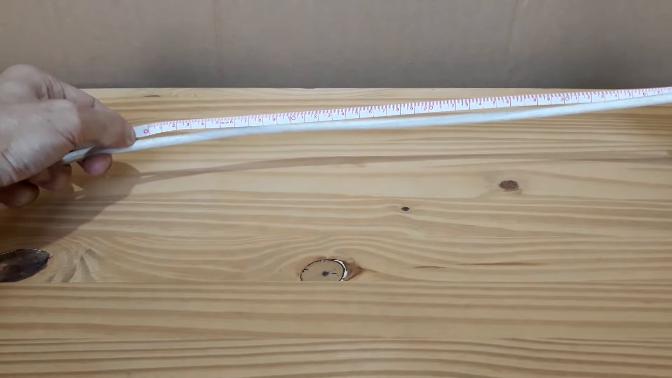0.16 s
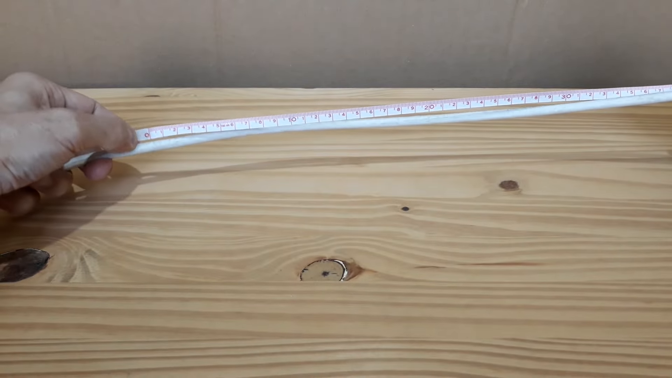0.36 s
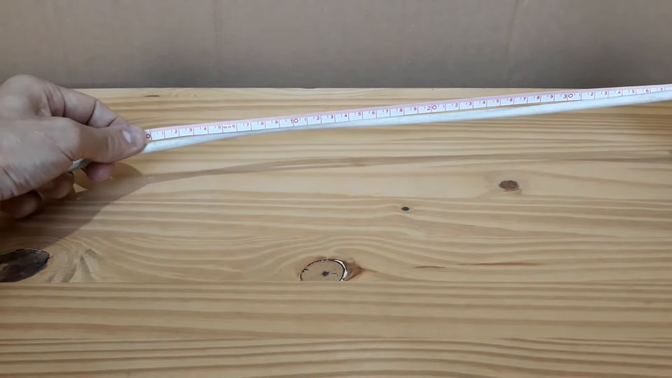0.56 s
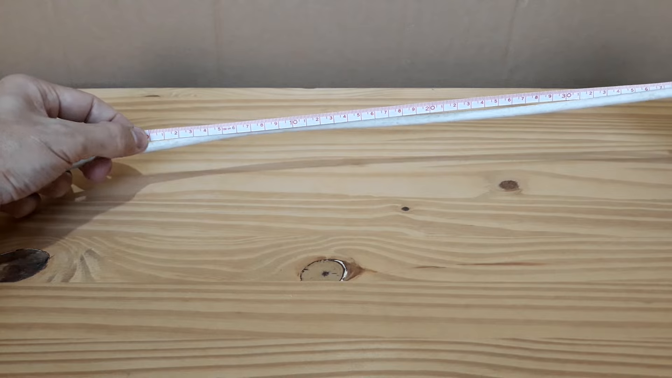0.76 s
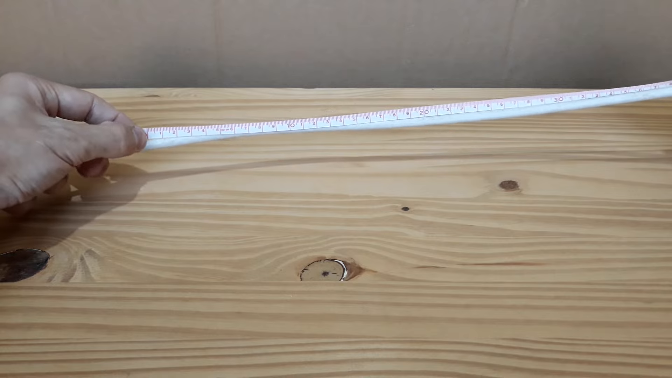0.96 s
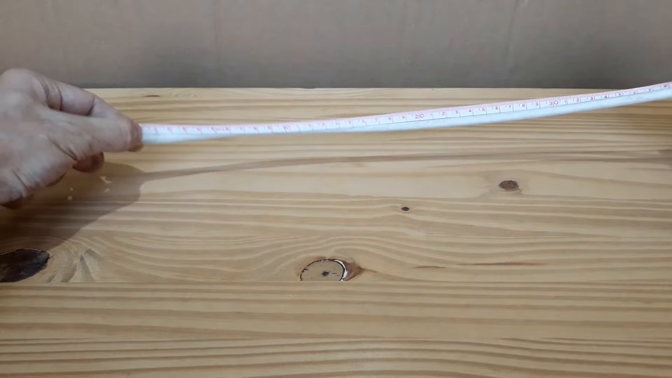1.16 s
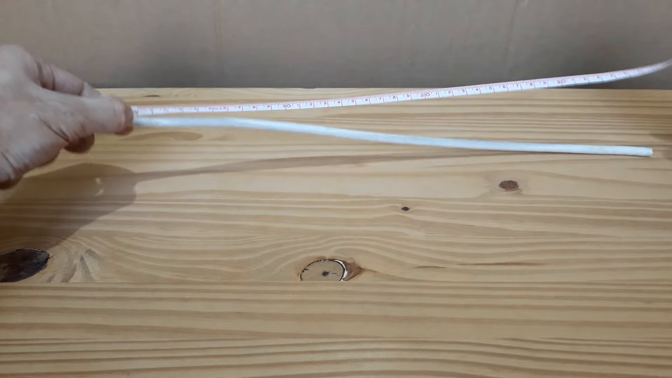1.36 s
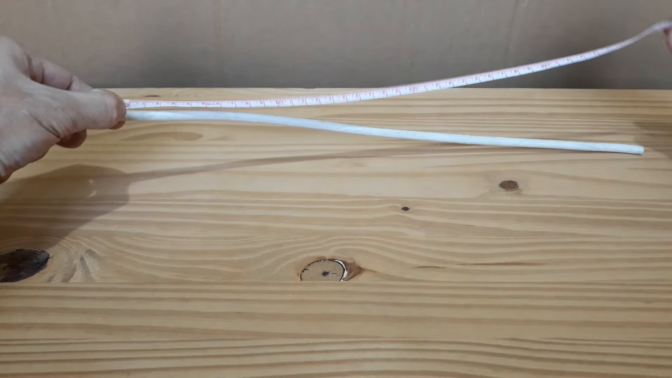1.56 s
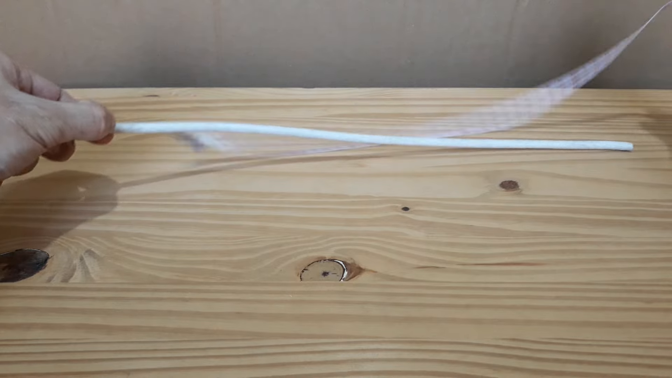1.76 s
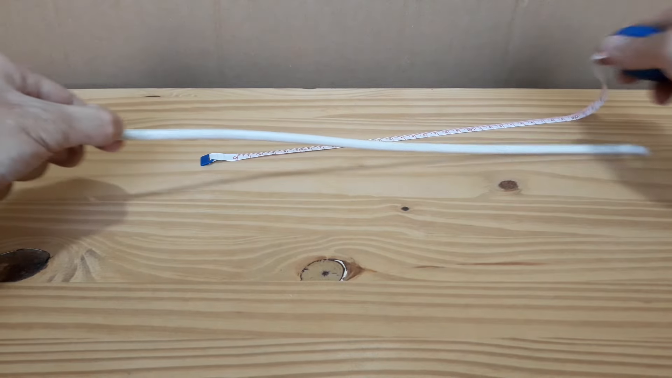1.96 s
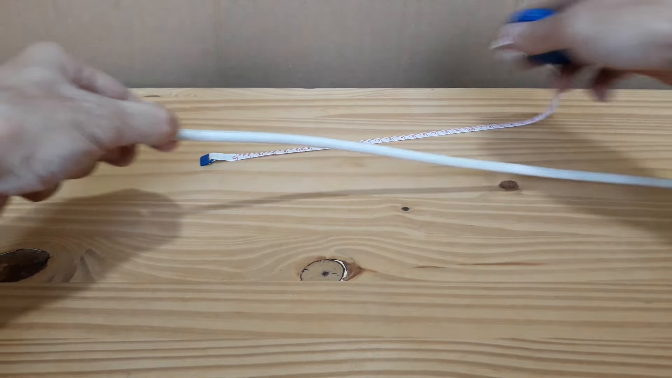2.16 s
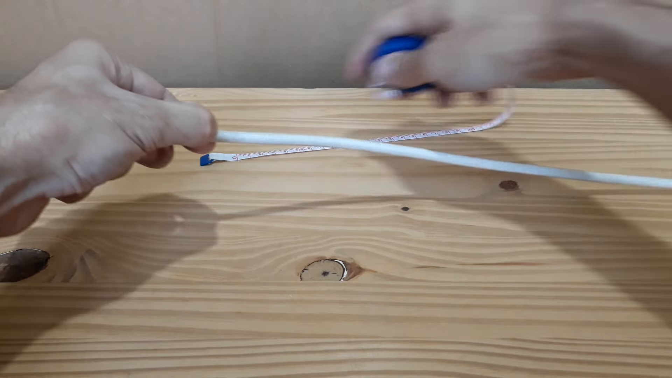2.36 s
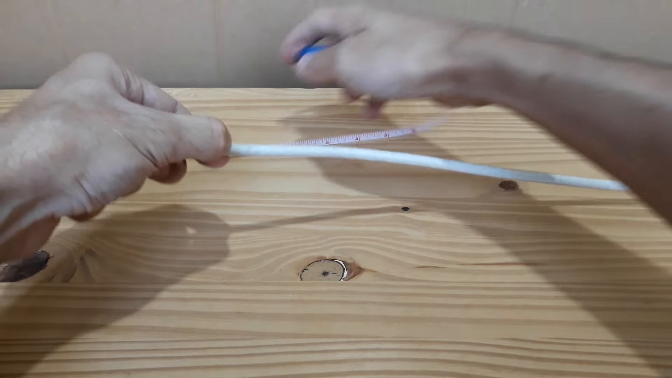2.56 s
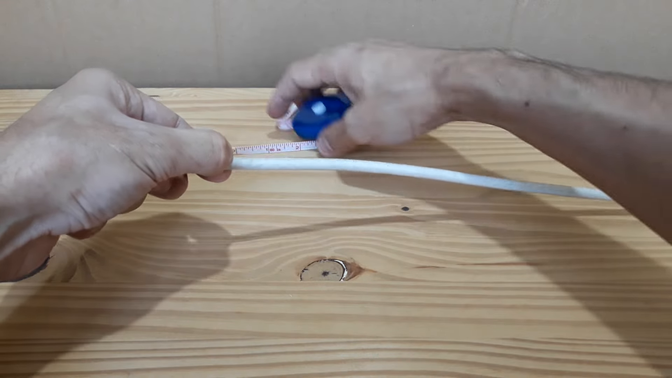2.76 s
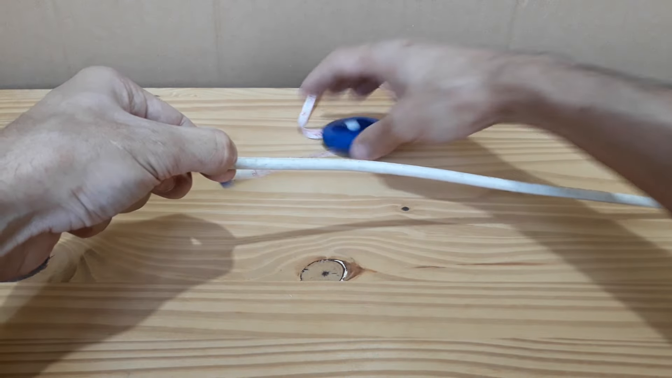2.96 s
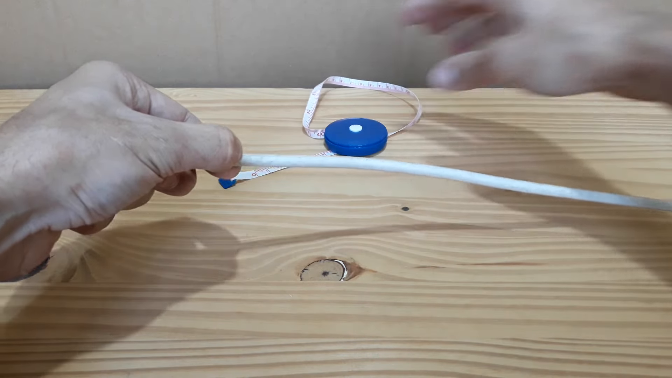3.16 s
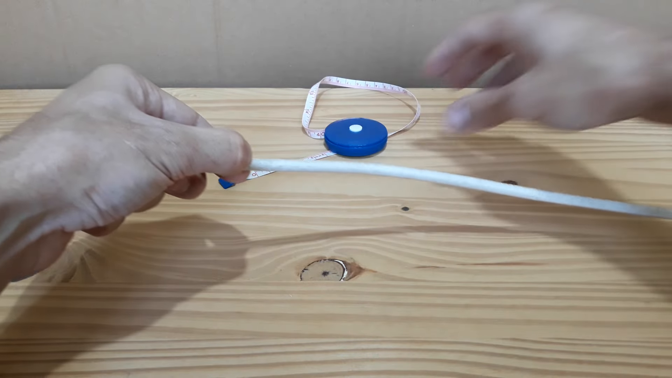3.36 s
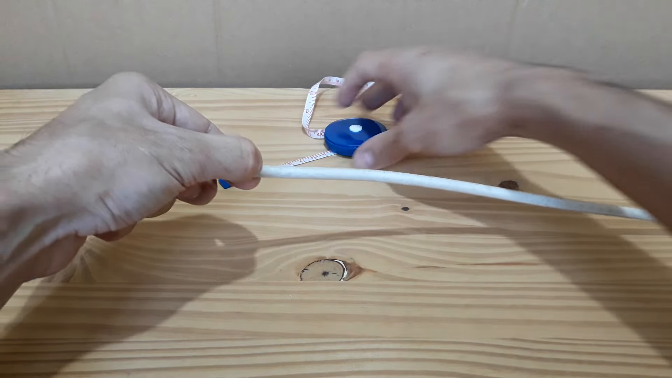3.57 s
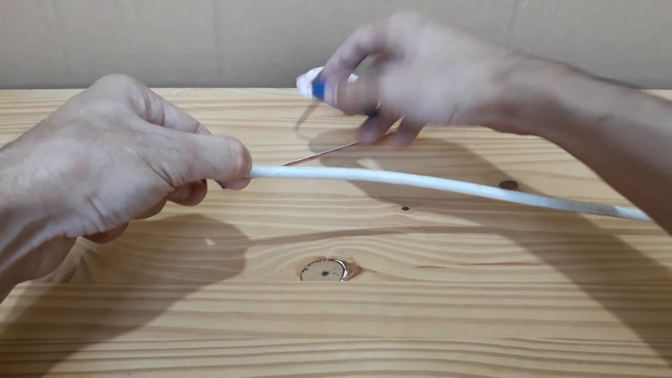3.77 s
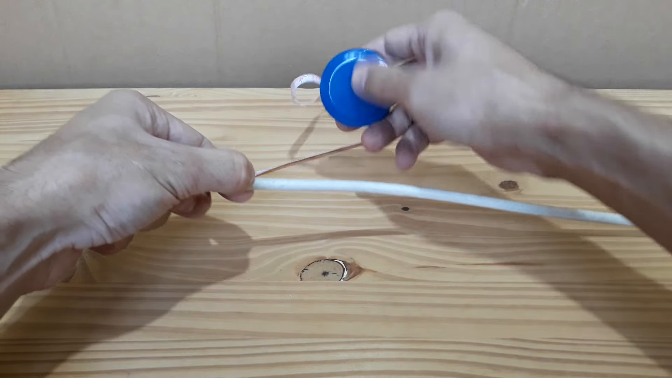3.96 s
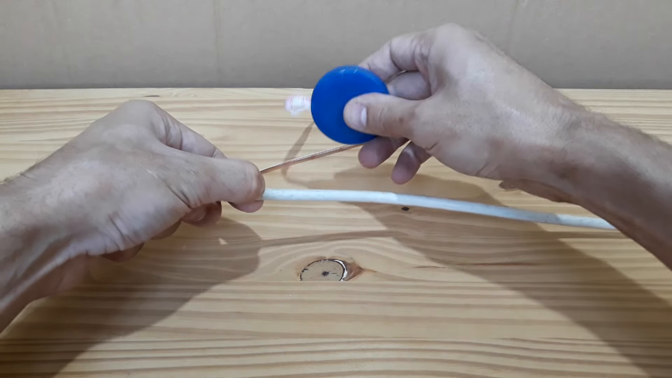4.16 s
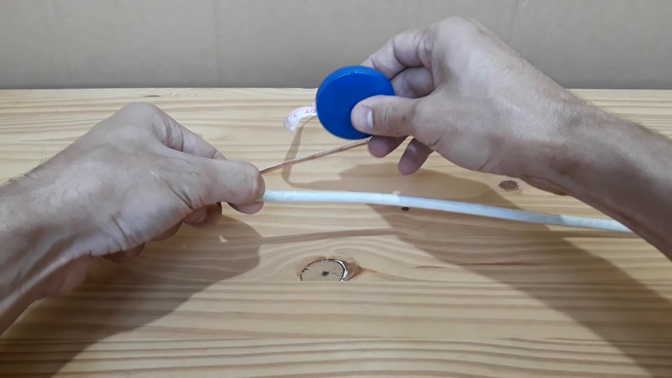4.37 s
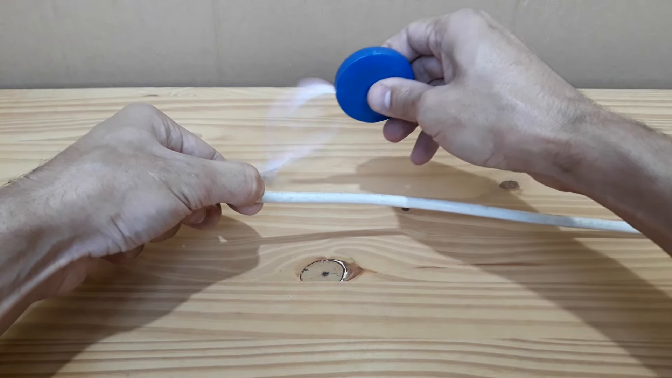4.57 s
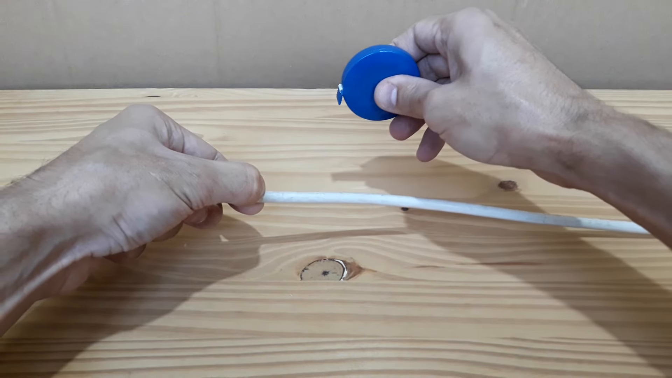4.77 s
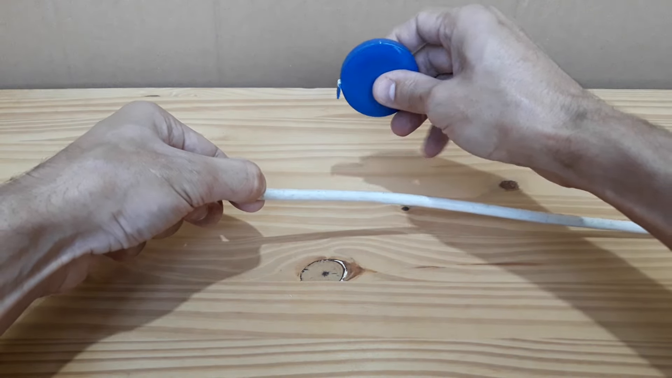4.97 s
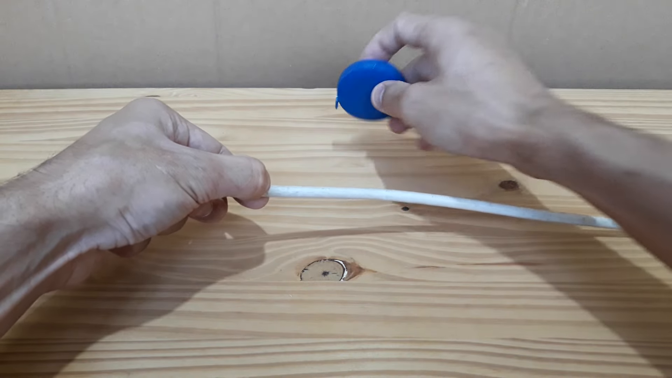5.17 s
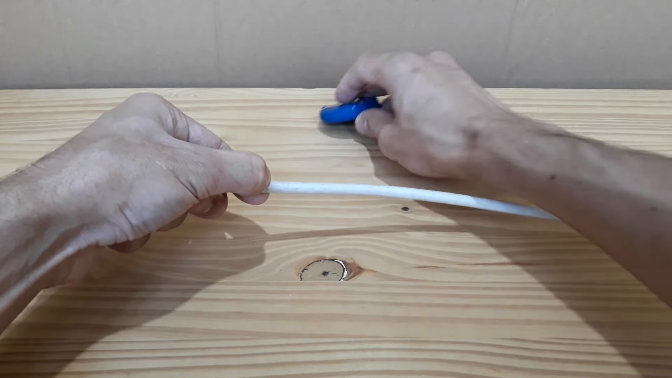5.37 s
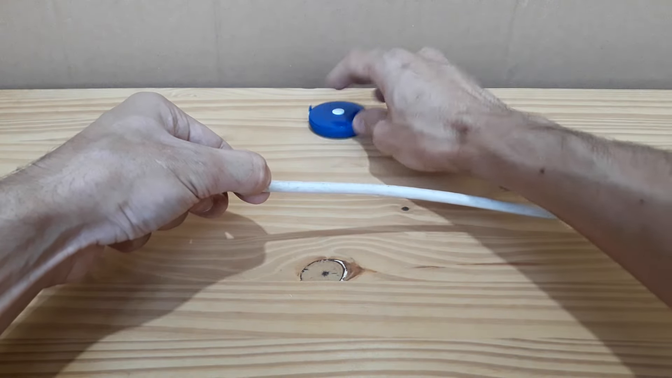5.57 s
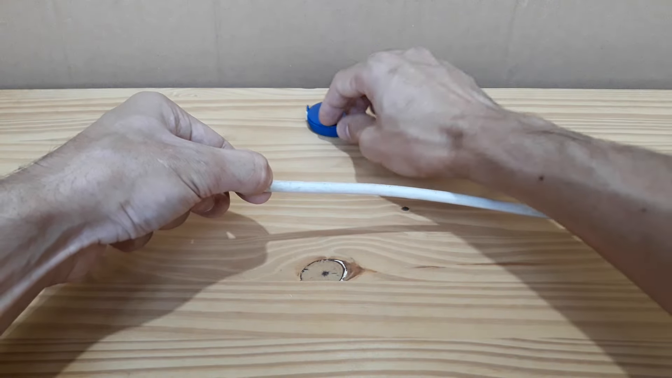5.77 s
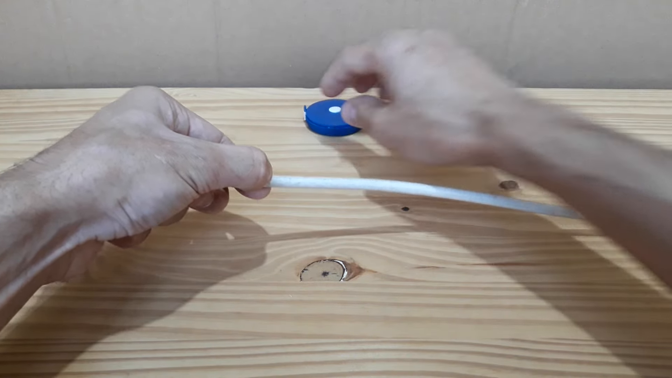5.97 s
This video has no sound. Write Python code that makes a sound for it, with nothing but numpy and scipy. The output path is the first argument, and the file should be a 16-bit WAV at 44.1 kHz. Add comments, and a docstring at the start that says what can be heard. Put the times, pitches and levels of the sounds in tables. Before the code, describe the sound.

A plastic rod slaps a wooden board, a small case drops and bounces, then a spring tape rattles in, snaps home hard and is set down.

```python
"""Spring tape measure on a wooden table

A small tape measure is handled in a bare, echoing room, over a faint rumble and hiss.
A plastic rod slaps the board; the case drops, is picked up, and its button lets the tape rattle in
and snap home so hard that a limiter ducks; then it is set down. Blows are bursts of tiny rebounds
shaped by the struck body, rubbing is a stream of random grains, and echoes are fading noise."""
import sys
import numpy as np
from scipy import signal
from scipy.fft import rfft, irfft
from scipy.io import wavfile
from scipy.ndimage import uniform_filter1d

SR = 44100
rng = np.random.default_rng(int(sys.argv[2]) if len(sys.argv) > 2 else 0)


def unload_audio(sound):
    """Save the sound as a 16-bit wav file, at the path given as the first command line argument."""
    columns = np.transpose(np.atleast_2d(sound))
    # keep every value between -1 and 1, then stretch to whole-number steps
    steps = np.round(np.clip(columns, -1, 1) * 32767)
    wavfile.write(sys.argv[1], SR, steps.astype(np.int16))


N = 265834
TIME = np.arange(N) / SR

# In the tables, energy is that of one blow; tilt brightens (+) or dulls (-) it above 100 Hz;
# chatter sets how slowly its rebounds fade; room is the level sent to the echoes, against the direct sound.

# Resonances of the wooden board: f/Hz, width/Hz, lift/dB
BOARD_RESONANCES = [(309.5, 22, 11.5), (385.8, 16, 12), (515, 26, 7), (698, 49, 4), (1104, 40, 2),
                    (1320, 55, 3.5), (1485, 30, 3.5), (1720, 40, 2), (2300, 60, 3.5), (2910, 130, 4.5),
                    (3430, 120, 3.5), (4000, 88, 4), (4680, 170, -2.5)]
# Resonances of the case: f/Hz, width/Hz, lift/dB
CASE_RESONANCES = [(1113, 220, 3.3), (3260, 110, 2), (4230, 90, 1.8), (4600, 216, 4.3), (5000, 150, 2.5),
                   (6470, 86, 4.8), (6540, 60, 2.9), (7530, 56, 2.3), (10300, 200, 3.4), (14370, 200, 2.8)]
# Broad colour of the spool: f/Hz, level/dB
SPOOL_COLOUR = [(150, -28), (550, -23.5), (950, -7), (2000, -17), (3000, -9), (4500, 1), (5700, -5),
                (7200, 0), (10500, -16.5), (14500, -9)]
# The tape snaps home: t/s, energy/dB, tilt/dB per octave, chatter/s, room/dB
SNAPS_HOME = [(4.6482, 7.6, 0.0023, 0.0015, 12.5), (4.6658, 22.36, 0.012, 0.0037, 5.1)]
# The tape runs in between these times (s)
REWIND_START_S, REWIND_END_S = 4.490, 4.643


def from_db(db):
    """Turn decibels into a gain."""
    return 10 ** (np.asarray(db) / 20)


def at_hz(points, hz):
    """Read a table of (frequency, value) between its points, on a log-frequency axis."""
    f, value = np.transpose(points)
    return np.interp(np.log(np.maximum(hz, 1)), np.log(f), value)


def unit_energy(x):
    """Scale to a summed square of one."""
    return x / np.sqrt(np.sum(x ** 2) + 1e-20)


def through(x, response):
    """Pass a sound through an impulse response."""
    return signal.fftconvolve(x, response)[:N]


def add(track, s, sound):
    """Mix a sound into a track at a given time in seconds."""
    start = round(s * SR)
    track[start:start + len(sound)] += sound[:N - start]


def body(colour, resonances=(), tilt_db=0, size=8192):
    """How a body answers one sharp tap: a broad colour with resonances standing out of it."""
    hz = np.fft.rfftfreq(size, 1 / SR)
    db = at_hz(colour, hz) + tilt_db * np.log2(np.maximum(hz, 100))
    for centre, width, lift_db in resonances:
        db = db + lift_db / (1 + (2 * (hz - centre) / width) ** 2)
    # Minimum phase: nothing rings before the blow
    cepstrum = irfft(np.log(from_db(db)))[:size // 2]
    cepstrum[1:] *= 2
    response = irfft(np.exp(rfft(cepstrum, size)))
    return unit_energy(response[:size // 2])


def chatter(decay_s, size=4096):
    """Force of one contact: a burst of tiny rebounds, roughly even in spectrum."""
    fade = np.exp(-TIME[:size] / decay_s)
    burst = rng.standard_normal(size) * fade * (1 - fade ** 5)
    spectrum = rfft(burst)
    even = irfft(spectrum / np.abs(spectrum))
    return unit_energy(even * fade ** (1 / 3))


def contacts(rows, colour, resonances):
    """Blows on one body, as a pair: sound straight to the microphone, sound into the room."""
    direct, into_room = np.zeros((2, N))
    for s, db, tilt_db, decay_s, room_db in rows:
        force = chatter(max(decay_s, 1 / SR))
        blow = from_db(db) * through(force, body(colour, resonances, tilt_db))
        add(direct, s, blow)
        add(into_room, s, blow * from_db(room_db))
    return np.array([direct, into_room])


def alike(rows, decay_s, room_db):
    """Give a set of contacts one chatter setting and one room level."""
    return [(*row, decay_s, room_db) for row in rows]


def grains(per_s, spread_db):
    """Random tiny impacts of uneven size, with a mean power near one."""
    signs = rng.choice([-1, 1], N)
    sizes = from_db(spread_db * np.minimum(rng.exponential(1, N), 4)) * signs
    chance = np.maximum(per_s, 1) / SR  # of an impact in each sample
    hits = rng.random(N) < chance
    return hits * sizes / sizes.std() / np.sqrt(chance)


def strokes(rows, attack_s, release_s):
    """Gain of sliding movements: each swells up to its start, holds for its length and dies away."""
    gain = np.zeros(N)
    for s, length_s, db in rows:
        early = np.maximum(s - TIME, 0)
        late = np.maximum(TIME - s - length_s, 0)
        gain += from_db(db) * np.exp(-early / attack_s - late / release_s)
    return gain


def rubbing(gain, colour, per_s, spread_db, room_db):
    """Two surfaces catch and slip in fine grains; gives the direct sound and the sound into the room."""
    rub = through(gain * grains(per_s, spread_db), body(colour))
    return np.outer([1, from_db(room_db)], rub)


def background():
    """A slowly swelling, distant outdoor rumble and a steady hiss, both made of coloured noise."""
    # Rumble level before a further 1 dB of gain: t/s, level/dB
    rumble_level = [(0.0, -58), (1.47, -48), (1.82, -51), (3.04, -52), (3.46, -57), (4.01, -61), (4.3, -57)]
    # Colour of the rumble: f/Hz, level/dB
    rumble_colour = [(20, -14), (45, -7.5), (82, 2), (150, -3.5), (300, -1), (600, -6.5), (1100, -10),
                     (1700, -13.5), (2600, -25), (6000, -27.5), (15000, -78.5)]
    # Colour of the hiss: f/Hz, level/dB
    hiss_colour = [(200, 6.5), (1500, -12.5), (2700, -19), (3300, -25), (3800, 9.5), (4700, 7), (5500, -17),
                   (8700, -18), (9800, -23.5), (15000, -9.5)]
    s, level_db = np.transpose(rumble_level)
    swell = from_db(np.interp(TIME, s, level_db) + 1)
    rumble = swell * through(rng.standard_normal(N), body(rumble_colour))
    hiss = from_db(-64.5) * through(rng.standard_normal(N), body(hiss_colour))
    return rumble + hiss


def finger_rub(holding_db):
    """Fingers slide on tape and case in fine grains, faintly even while just holding."""
    # Finger slides: t/s, length/s, level/dB
    slides = [(.42, .04, -66), (2.03, 0.076, -59.5), (2.63, 0.1, -70.5), (3.93, 0.045, -74),
              (5.8, 0.25, -69.5)]
    # Colour of the finger rub: f/Hz, level/dB
    colour = [(500, -5), (2500, -2), (4500, 7.5), (6500, 0.5), (9000, 0.5), (11000, -12), (15000, -3)]
    gain = from_db(holding_db) + strokes(slides, attack_s=0.023, release_s=0.05)
    return rubbing(gain, colour, per_s=2300, spread_db=5.5, room_db=6.0)


def tape_ticks():
    """The tape flexes and ticks, in small blows coloured by the thin tape."""
    # Ticks: t/s, energy/dB, tilt/dB per octave
    ticks = [(.2998, -31, -2), (.345, -31, -2.5), (.451, -23, -3.5), (.668, -33, 0), (.8456, -29, -4.5),
             (1.0771, -27, -5.5), (1.3352, -18, 1), (1.3854, -15, -3), (1.7176, -29, 10),
             (1.8037, -14.5, 9.5), (2.6235, -25, -5.5), (2.9511, -14.5, 2.5), (3.9211, -31.5, 6)]
    # Broad colour of the tape: f/Hz, level/dB
    colour = [(300, -30), (1000, -10.5), (2000, -7), (2900, -3.5), (4300, 4), (6500, -18.5), (8500, -8.5),
              (10500, -25), (15000, -21.5)]
    return contacts(alike(ticks, decay_s=0.0026, room_db=3.0), colour, ())


def tape_drag():
    """The slack tape drags over the board in dense, even grains."""
    # Drags: t/s, length/s, level/dB
    drags = [(1.25, .03, -69), (2.82, 0.11, -70.5), (4.19, 0.39, -66.5)]
    # Colour of the dragging tape: f/Hz, level/dB
    colour = [(1000, -20), (4800, -24), (5700, 9.5), (6900, 2.5), (7800, -5.5), (15000, -30)]
    gain = strokes(drags, attack_s=0.064, release_s=0.03)
    return rubbing(gain, colour, per_s=8800, spread_db=0.0, room_db=-11.5)


def rod_slap():
    """The plastic rod slips from under the tape and slaps the board, which rings."""
    # The slap: t/s, energy/dB, tilt/dB per octave, chatter/s, room/dB
    slaps = [(1.3080, 10.5, 0, 0.0038, -1)]
    # Broad colour of the rod: f/Hz, level/dB
    colour = [(100, -24.5), (200, -9), (350, -8), (560, -5), (800, -9.5), (1200, 2.5), (1650, 0.5),
              (2100, -4.5), (2800, -7.5), (4200, -17.5), (8500, -22.5), (10500, -38.5), (15000, -29)]
    return contacts(slaps, colour, BOARD_RESONANCES)


def grip_rustle():
    """The hand shifts its grip: a dull rustle of uneven grains."""
    # Grip shifts: t/s, length/s, level/dB
    shifts = [(1.85, 1.0, -55), (3.88, 0.063, -63.5), (4.42, .06, -66), (5.79, .24, -53)]
    # Colour of the rustle: f/Hz, level/dB
    colour = [(80, -9.5), (200, -4), (600, -1.5), (1000, 0.5), (1700, -3), (2500, -12), (8000, -35)]
    gain = strokes(shifts, attack_s=0.08, release_s=0.23)
    return rubbing(gain, colour, per_s=4000, spread_db=3.0, room_db=-3.5)


def tab_hits():
    """The tab on the tape's end strikes the board, and later the case, and rings."""
    # Strikes: t/s, energy/dB, tilt/dB per octave, chatter/s, room/dB
    strikes = [(1.8370, -4.5, 2.5, 0.0034, -5), (1.8472, -9, -2.5, .002, -17),
               (4.6180, 0.5, -2, .003, -2.5)]
    # Broad colour of the end tab: f/Hz, level/dB
    colour = [(300, -21.5), (1100, -7.5), (2200, -4), (3200, -5.5), (4800, -4), (6500, -3), (8500, -5.5),
              (10800, -15), (15000, -11)]
    # Resonances of the end tab: f/Hz, width/Hz, lift/dB
    resonances = [(3320, 920, 12), (12700, 460, 19.5)]
    return contacts(strikes, colour, resonances)


def case_touches():
    """Fingers knock the case, in small blows coloured by the held case."""
    # Knocks: t/s, energy/dB, tilt/dB per octave
    touches = [(2.8226, -15, 3), (3.6505, -22, 4), (3.6622, -16, 1), (3.668, -12.5, -1), (3.674, -22, 3),
               (4.4636, -23, -1), (4.4795, -7.5, -5.5)]
    # Broad colour of the held case: f/Hz, level/dB
    colour = [(150, -33), (400, -19), (800, -15), (1100, 5.5), (1700, -7.5), (2600, -14), (3700, -13),
              (4800, -8), (6300, -19), (8500, -17.5), (10500, -35), (15000, -27)]
    return contacts(alike(touches, decay_s=0.003, room_db=-2.5), colour, BOARD_RESONANCES)


def case_drop():
    """The case drops onto the board and bounces, one blow for each landing."""
    # Drop and bounces: t/s, energy/dB, tilt/dB per octave, chatter/s, room/dB
    drops = [(2.9892, -12.5, -2, 0.0022, 1), (2.9934, 10, -0.5, 0.0025, 4), (3.0195, -13, -1, .002, 6),
             (3.074, -2, -1.8, 0.002, -4)]
    # Broad colour of the dropped case: f/Hz, level/dB
    colour = [(150, -38), (350, -23), (880, -13), (1130, -3.5), (1650, -5), (2050, -5), (2750, -12),
              (3700, -6.5), (4900, -5), (6300, -16.5), (8500, -12), (10500, -25), (15000, -16)]
    return contacts(drops, colour, BOARD_RESONANCES)


def button_clicks():
    """The button and its catch click, heard through the spool and case."""
    # Clicks: t/s, energy/dB, tilt/dB per octave
    clicks = [(4.4789, -1.5, -3), (5.3694, -6.5, -3), (5.392, -17, 0)]
    return contacts(alike(clicks, decay_s=0.0042, room_db=-2), SPOOL_COLOUR, CASE_RESONANCES)


def spool_speed(s):
    """The spring pulls evenly: speed rises from 0 to 1 over the rewind."""
    return np.clip((s - REWIND_START_S) / (REWIND_END_S - REWIND_START_S), 0, 1)


def rewind(room_db):
    """The spring speeds the spool up; the tape knocks ever faster and louder against the slot."""
    start_db, full_db = -38.5, -22  # rattle level at rest and at full speed
    start_per_s, full_per_s = 800, 4600  # knocks per second
    speed = spool_speed(TIME)
    level_db = start_db + (full_db - start_db) * speed
    per_s = start_per_s * (full_per_s / start_per_s) ** speed
    running = (TIME > REWIND_START_S) & (TIME < REWIND_END_S)
    knocks = running * from_db(level_db) * grains(per_s, spread_db=1.5)
    rattle = through(knocks, body(SPOOL_COLOUR, CASE_RESONANCES))
    return np.outer([1, from_db(room_db)], rattle)


def spool_clacks(count, tilt_db):
    """The spool clacks as it speeds up: ever closer, ever harder blows."""
    start_s, first_gap_s = 4.5541, 0.042
    gap_share = 0.575  # each gap is this share of the one before
    start_db, full_db = -16, 6  # energy at rest and at full speed
    gaps = first_gap_s * gap_share ** np.arange(count - 1)
    times = start_s + np.append(0, np.cumsum(gaps))
    clacks = [(s, start_db + (full_db - start_db) * spool_speed(s), tilt_db) for s in times]
    return contacts(alike(clacks, decay_s=0.0033, room_db=-4.0), SPOOL_COLOUR, CASE_RESONANCES)


def end_snaps():
    """The tape hits its end stop in hard, bright blows that ring the case."""
    # Broad colour of the end stop: f/Hz, level/dB
    colour = [(200, -21.5), (550, -16.5), (950, -8), (1700, -10), (3000, -11.5), (4500, -2.5), (7500, 3),
              (11000, 0), (14500, 4), (16000, 3.5)]
    return contacts(SNAPS_HOME, colour, CASE_RESONANCES)


def microphone_thump(db, hz, q, decay_s):
    """The snap overloads the microphone: a jump in pressure that swings back through its bass cut."""
    age = TIME - SNAPS_HOME[0][0]
    jump = from_db(db) * (age > 0) * np.exp(-np.abs(age) / decay_s)
    w = 2 * np.pi * hz / SR
    bass_cut = signal.bilinear([1, 0, 0], [1, w / q, w * w])
    return signal.lfilter(*bass_cut, jump + 1e-18)


def set_down():
    """The case is set down on the board, then rocks to rest in even, fading beats."""
    # Landing: t/s, energy/dB, tilt/dB per octave
    landing = [(5.5075, -5, -2.5), (5.5152, 5.5, 1.5), (5.521, -2.5, 1.5)]
    # Broad colour of the case lying flat on the board: f/Hz, level/dB
    colour = [(150, -27), (400, -18), (750, -4), (1100, 3.5), (2000, -0.5), (2450, -20), (4600, -12.5),
              (6300, -14), (8600, -8), (10500, -26), (15000, -14)]
    start_s, period_s = 5.565, 0.0425
    first_db, loss_db, tilt_db = -7, 1, -3  # each beat is weaker by loss_db
    beats = [(start_s + k * period_s, first_db - k * loss_db, tilt_db) for k in range(3)]
    blows = alike(landing, decay_s=0.0048, room_db=-1.8) + alike(beats, decay_s=0.0038, room_db=-3.0)
    return contacts(blows, colour, BOARD_RESONANCES)


def room(x, build_s, first_echo_s, size=65536):
    """Diffuse echoes, made of noise, that build up quickly and mostly die sooner in the treble."""
    # Time for the echoes to fall by 60 dB: f/Hz, t/s
    fall_time = [(100, 1.17), (400, 0.93), (1500, 0.9275), (3200, 0.83), (4600, 0.9355), (6500, 0.5435),
                 (9000, 0.65), (13000, 0.34), (16000, 0.17)]
    # Colour the room adds: f/Hz, level/dB
    colour = [(100, 4.5), (300, 1.5), (700, 3), (1300, -1.5), (2500, 0.5), (5000, -1.5), (9000, -2),
              (15000, 4.5)]
    t, hz = TIME[:size], np.fft.rfftfreq(size, 1 / SR)
    noise = rfft(rng.standard_normal(size)) * from_db(at_hz(colour, hz))
    centres = np.geomspace(100, 16000, 16)
    tail = 0
    # Overlapping bands share the noise, and each fades at its own pace
    for centre, share in zip(centres, np.eye(len(centres))):
        band = irfft(noise * np.interp(hz, centres, share))
        tail = tail + band * np.exp(-np.log(1000) * t / at_hz(fall_time, centre))
    onset = 1 - np.exp(-np.maximum(t - first_echo_s, 0) / build_s)
    return through(x, tail * onset * from_db(-34))


def scene():
    """All contacts, rubbing and the rewind, heard directly and through the room."""
    handling = finger_rub(holding_db=-82) + tape_ticks() + tape_drag() + grip_rustle() + tab_hits()
    table_blows = rod_slap() + case_touches() + case_drop() + set_down()
    spool = button_clicks() + rewind(room_db=-2.5) + spool_clacks(count=5, tilt_db=-0.2) + end_snaps()
    direct, into_room = handling + table_blows + spool
    echoes = room(into_room, build_s=0.002, first_echo_s=0.0012)
    thump = microphone_thump(db=-1.0, hz=92.2, q=1.52, decay_s=0.014)
    return (direct + echoes + thump + background())[None]


def limiter(x, threshold_db, release_db_per_s, ahead_s):
    """Gain drops just ahead of a loud peak and creeps back."""
    power = uniform_filter1d(x[0] ** 2, size=44)
    level_db = 10 * np.log10(np.maximum(power, 1e-12))
    excess_db = np.maximum(level_db - threshold_db, 0)
    # Hold the largest excess so far, letting it shrink at a steady pace
    release_db = release_db_per_s * TIME
    held_db = np.maximum.accumulate(excess_db + release_db) - release_db
    smooth_db = uniform_filter1d(held_db, size=88)
    return x * from_db(-np.interp(TIME + ahead_s, TIME, smooth_db))


def record(dry):
    """The recorder's limiter, then a steep cut of everything above 15.9 kHz."""
    limited = limiter(dry, threshold_db=-12.5, release_db_per_s=5.5, ahead_s=0.0028)
    top_cut = signal.ellip(12, 0.1, 80, 15900, fs=SR, output="sos")
    return signal.sosfilt(top_cut, limited)


dry = scene()
out = record(dry)
unload_audio(out)
```